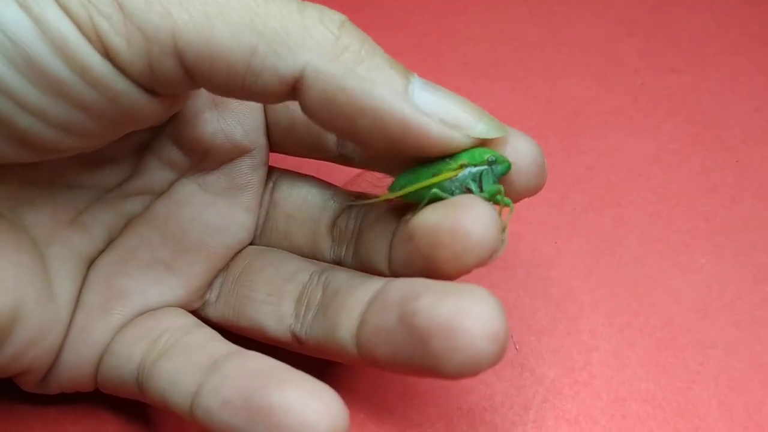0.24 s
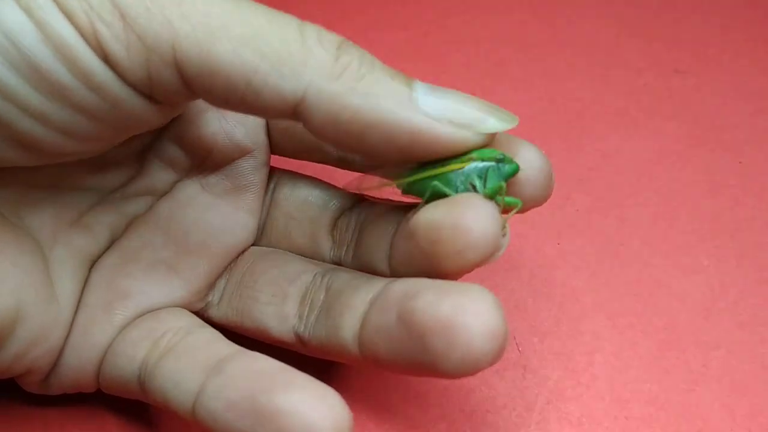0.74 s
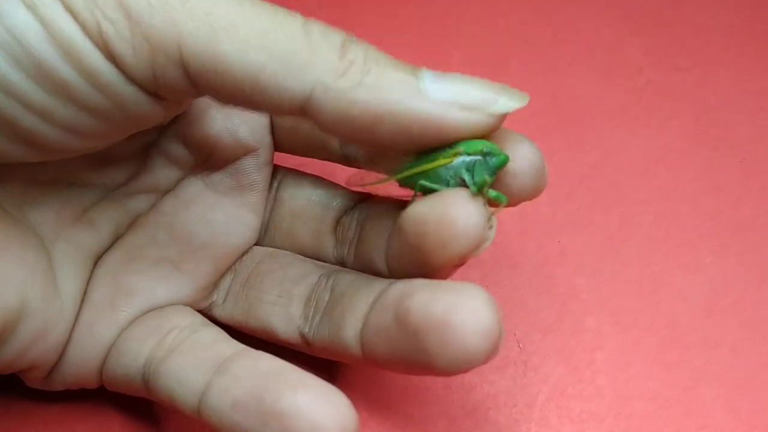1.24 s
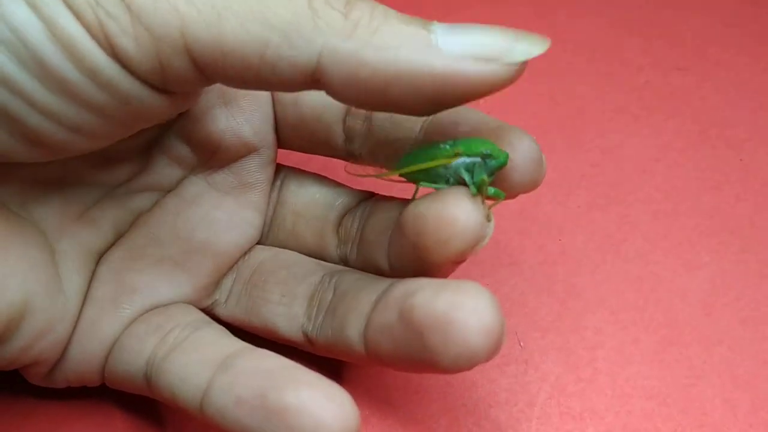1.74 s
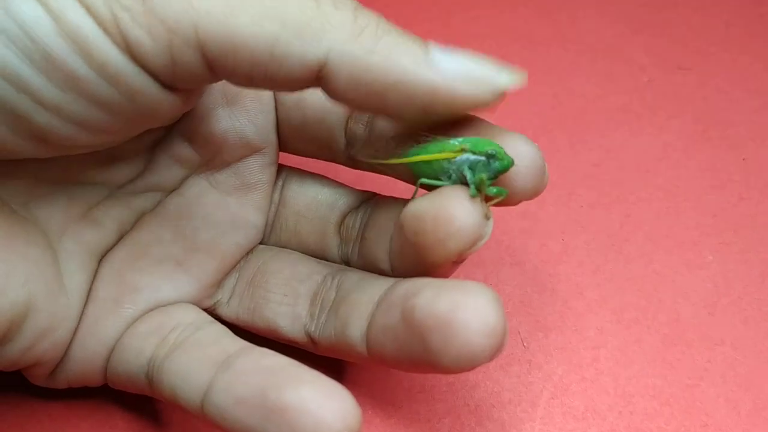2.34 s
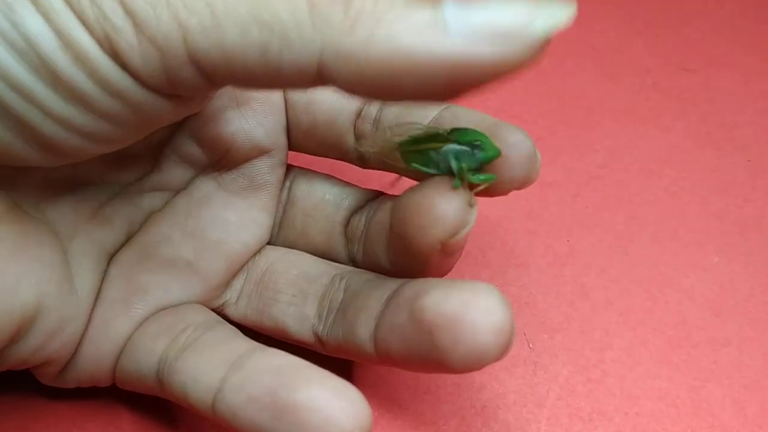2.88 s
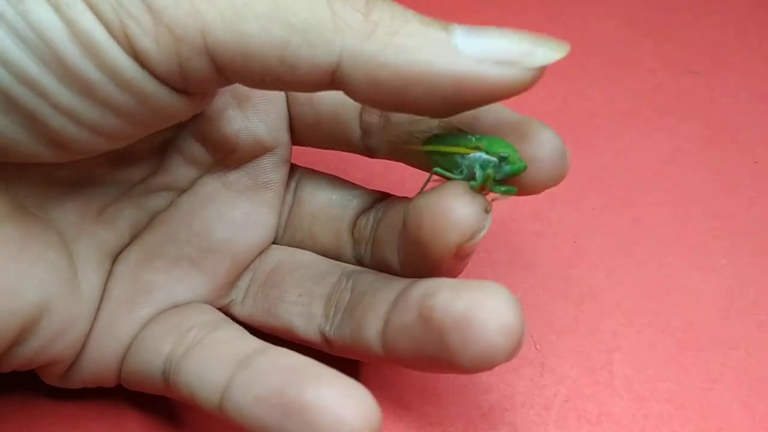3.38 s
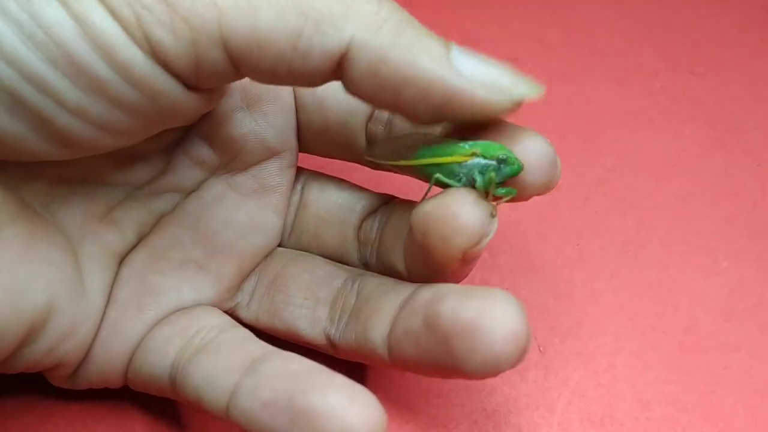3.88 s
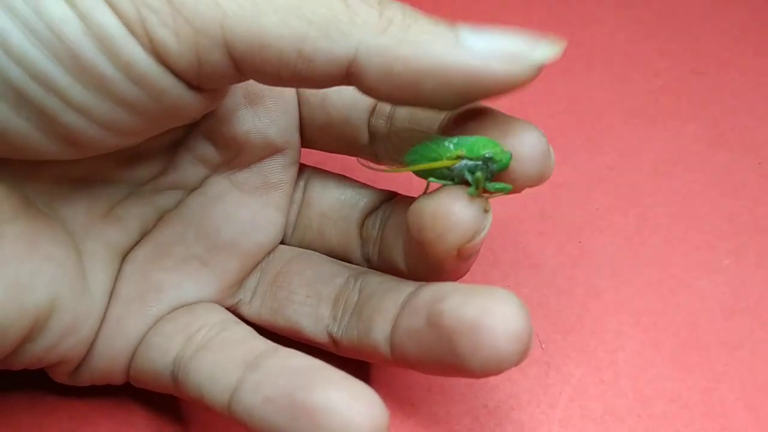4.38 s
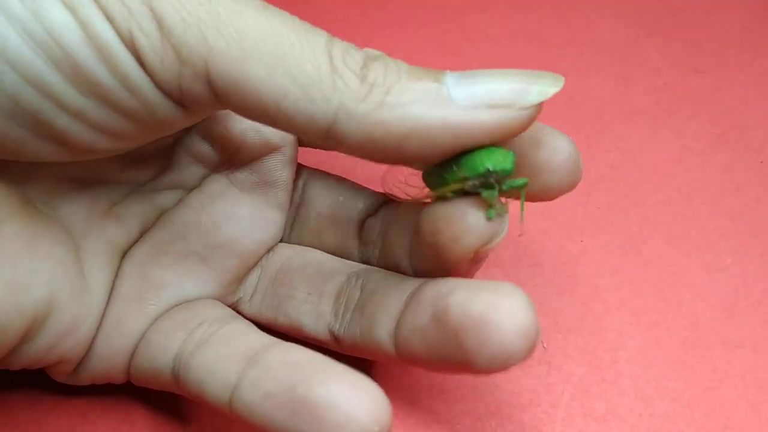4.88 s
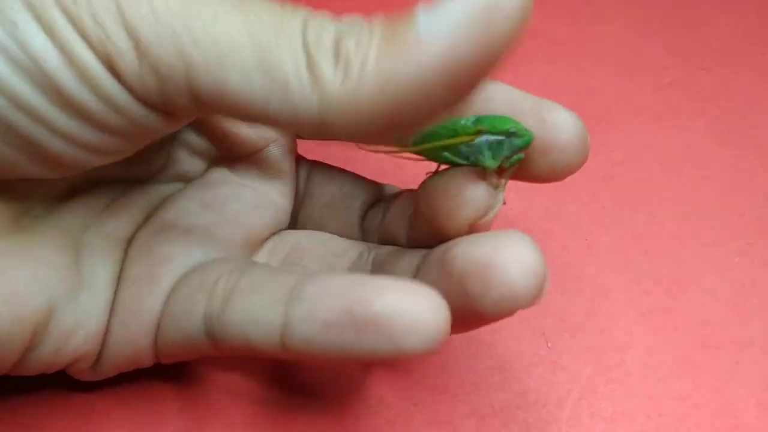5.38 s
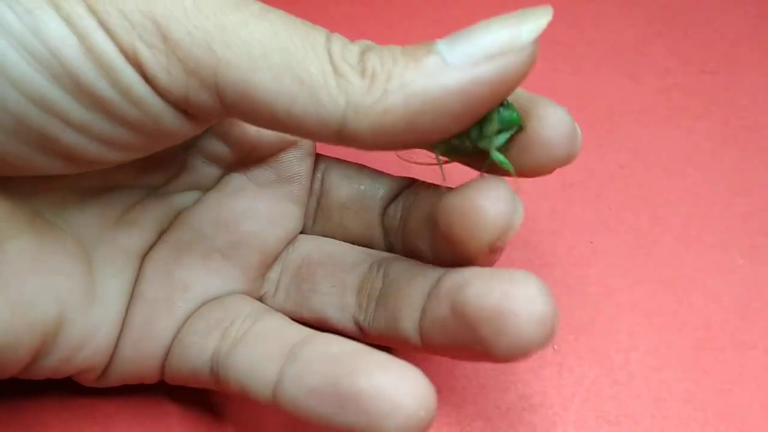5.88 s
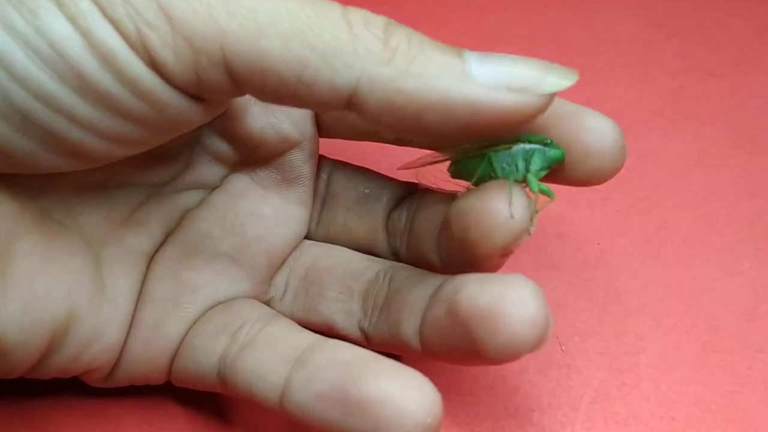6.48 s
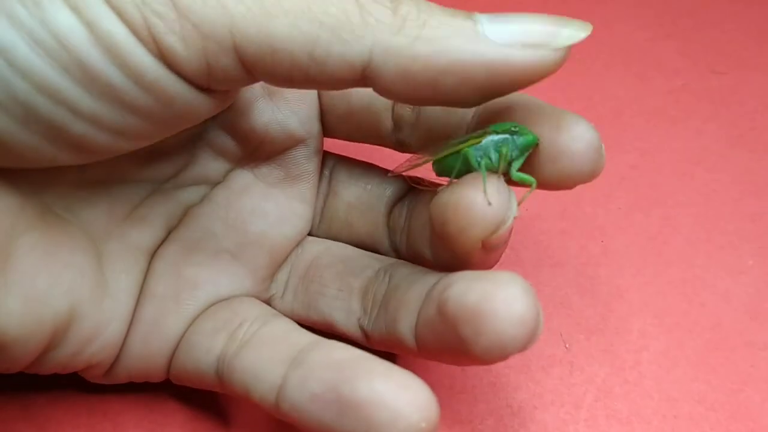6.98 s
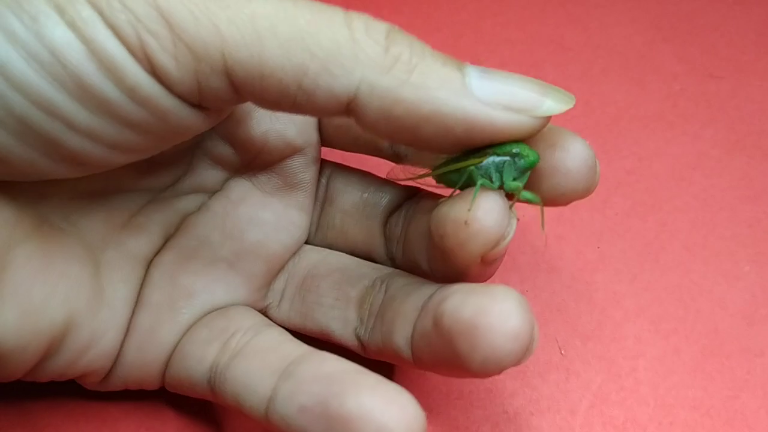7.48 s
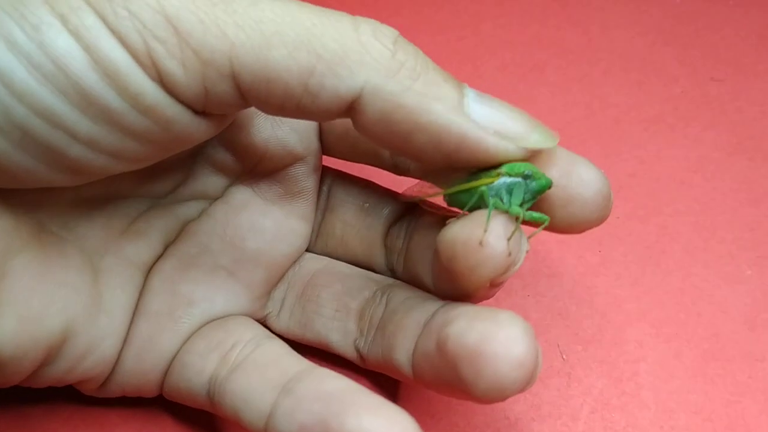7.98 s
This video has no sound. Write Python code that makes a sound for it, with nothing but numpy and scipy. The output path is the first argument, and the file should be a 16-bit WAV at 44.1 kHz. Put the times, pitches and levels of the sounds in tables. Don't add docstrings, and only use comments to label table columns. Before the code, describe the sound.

A cicada held between fingers, very close to a stereo microphone in a quiet room, calls at once: a loud, shrill, dry buzz of rapid clicks, about 140 a second. It runs unbroken for four seconds, then stutters in irregular bursts with brief pauses. Low room and street hum rises in each gap, with faint distant insects. Short scatter from hand and table and a light room tail surround the buzz.

```python
import sys
import numpy as np
from scipy import signal
from scipy.io import wavfile
from scipy.ndimage import uniform_filter1d

SR = 44100
rng = np.random.default_rng(int(sys.argv[2]) if len(sys.argv) > 2 else 0)


def makeup_ratio(level_db):
    decades = np.asarray(level_db, float) / 20
    return 10 ** decades


def put_to_file(sound):
    columns = np.atleast_2d(sound).T
    safe = np.clip(columns, -1, 1)
    whole_steps = np.round(safe * 32767)
    wavfile.write(sys.argv[1], SR, whole_steps.astype(np.int16))


N = 362943

# [f/Hz, level/dB per Hz]
HUM_SPECTRUM = [(35, -35), (100, -93), (190, 2.5), (280, 0), (500, -8.5), (900, -15), (1600, -14),
                (2300, 1), (3400, -86), (4900, -23), (6300, -31), (8800, -15), (12000, -38), (16000, -50)]
# [f/Hz, likeness]
PORT_LIKENESS = [(60, .66), (140, 0.86), (330, 0.93), (770, 0.47), (1200, -1.2), (1800, -0.2),
                 (2700, -0.82), (5000, -3.1)]
# [start t/s, end t/s, f/Hz, level/dB]
DISTANT_TONES = [
    (0.05, 0.45, 533, -60),
    (1.68, 1.9, 520, -61),
    (2.1, 2.3, 500, -56),
    (6.56, 6.74, 840, -56),
    (-1, 9, 119, -68),
    (-1, 9, 97, -73),
]
# [low f/Hz, high f/Hz, level/dB]
DISTANT_INSECTS = [(4230, 5300, -46), (7800, 10000, -49)]
# [first t/s, pulses, gap/ms, starting tymbal 0-1]
UNBROKEN_CALL = [(0.0013, 121, 7.211, 0), (0.8738, 40, 7.343, 1), (1.1675, 20, 7.14, 1),
                 (1.3103, 81, 7.28, 1), (1.9, 20, 7.38, 0), (2.0554, 75, 7.33, 1), (2.6135, 3, 7.43, 1),
                 (2.6444, 1, 7.0, 0), (2.6583, 23, 7.42, 1), (2.8406, 17, 7.36, 1), (2.9758, 58, 7.3, 1),
                 (3.3992, 39, 7.487, 1), (3.6912, 58, 7.26, 0)]
# [first t/s, pulses, gap/ms, starting tymbal 0-1]
STUTTER_BURSTS = [(4.1415, 2, 5.6, 0), (4.1644, 19, 7.32, 1), (4.3238, 1, 7.0, 0), (4.3515, 21, 7.34, 1),
                  (4.6508, 13, 7.58, 1), (4.9748, 1, 7.0, 0), (4.9925, 19, 7.24, 1), (5.1773, 1, 7.0, 0),
                  (5.2177, 19, 7.27, 1), (5.5495, 32, 7.17, 1), (5.7877, 39, 6.87, 0),
                  (6.0556, 19, 7.18, 1), (6.2236, 11, 7.07, 1), (6.3759, 3, 7.35, 1), (6.4067, 17, 7.01, 1),
                  (6.6276, 3, 8.14, 1), (6.7029, 50, 7.0, 1), (7.1553, 20, 7.12, 1), (7.3099, 3, 7.94, 0),
                  (7.3833, 6, 7.48, 0), (7.4754, 9, 7.45, 1), (7.6349, 4, 7.71, 0), (7.6931, 7, 8.21, 1),
                  (7.9295, 13, 7.1, 1), (8.1808, 2, 10.8, 0)]
# [t/s, early/ms]
TYMBAL_LIMP = [(0, .75), (.6, .55), (1.5, .65), (1.95, .9), (2.2, .65), (3.1, .45), (3.5, .9), (4.2, .95),
               (5.3, 1.1), (6.2, .7), (6.5, 1.3), (7.1, 1.1), (7.4, 1.6), (7.7, .7), (8, 1.25)]
# [t/s, rib level/dB, top level/dB]
GRIP_SHADE = [(0.0, -2, -4), (0.5, 0, -5), (0.8, -0.5, -4), (1.1, 0.5, -3.5), (1.9, 0.5, -4.5),
              (2.5, 1, -5.5), (3.0, 1, -4), (3.35, -1, -5), (3.6, 1, -2.5), (3.9, -.5, -5), (4.05, 1, -5),
              (4.7, 1, -1.5), (5.0, -8, 3), (5.3, -0.5, -2.5), (6.0, 1.5, -5.5), (6.45, -3, -1.5),
              (6.8, -0.5, -2.5), (8.2, -2.5, -3.5)]
# [t/s, level/dB]
SECOND_TYMBAL_LEVEL = [(0, 1), (1.9, -3.5), (2.2, -1), (4.1, 1), (4.7, 0.5), (5.03, 9), (5.3, 0.5), (5.9, 1),
                       (6.45, 3), (8.2, 3)]
# [t/s, first tymbal L-R/dB, second tymbal L-R/dB]
BODY_TURN = [(0.0, 0.6, 0.2), (0.95, -0.3, 2.0), (1.8, 0.2, 2.8), (2.35, 0.2, 0.0), (3.1, -0.5, -0.9),
             (4.1, 0.4, 0.2), (5.2, -1.7, -0.4), (6.0, -0.5, -1.6), (7.2, 1.3, 0.8), (8.0, 0.2, -0.8)]
# [f/Hz, start/ms, t60/ms, first tymbal level/dB, second tymbal level/dB, L-R/dB, left phase/turns]
RIB_MODES = [
    (5630, 0.01, 2.08, -2.5, -3.5, 0, 0.22),
    (5040, 0.25, 3.4, -6, -10, -13.5, 0.16),
    (4367, 0.72, 4.56, -6, -9, 14, 0.045),
    (3324, 0.66, 1.69, -14, -15.5, -17, 1),
]
# [Hz, ms, ms, dB, dB, dB, turns]
OVERTONE_MODES = [(6397, 0.083, 9.1, -13.5, -11, 2, 0.33), (7000, 0.078, 3.1, -10, -13, -6.5, 0.25),
                  (8185, 0.172, 7.3, -28, -21, 11.5, 0.6), (8490, 0.171, 1.43, -8.5, -12, -8.5, 0.56),
                  (9642, 0.2794, 4.13, -18.5, -15, -5, 0.69)]
# [Hz, ms, ms, dB, dB, dB, turns]
TOP_MODES = [(11300, 0.4, 3.5, -22, -19, -11, 0.65), (12660, 0.54, 4, -21, -24, 0, 0.0),
             (13800, 0.53, 6.6, -22, -20, 5, 0.4), (14350, 0.285, 3.3, -20, -26, -13, 0.12),
             (15600, 0.18, 4, -18, -10, -7, 0.0)]
# [Hz, ms, ms, dB, dB, dB, turns]
POP_MODES = [(4400, 3.5, 2.5, -22, -22, 2, 0.0), (5600, 3.5, 2.0, -21, -21, 0, 0.25),
             (6800, 3.5, 2.0, -21, -21, -1, 0.22), (8500, 3.7, 2.5, -20, -17, 3, 0.52),
             (9800, 3.8, 2.0, -23, -22, -2, 0.68), (12200, 3.9, 2.0, -31, -31, 0, 0.0),
             (15200, 3.6, 2.5, -30, -30, 0, 0.0)]
# [f/Hz, t60/s]
ROOM_DECAY = [(2500, 0.33), (4500, 0.2), (8000, 0.28), (12000, 0.27), (16000, 0.2)]
# [f/Hz, width/Hz, level/dB]
PORT_CAVITIES = [(3170, 200, -7), (6050, 350, -8), (14200, 800, -5)]

PULSE_SAMPLES = 300


def at_hz(points, hz):
    table_hz, values = np.transpose(points)
    return np.interp(np.log(hz), np.log(table_hz), values)


def at_times(rows, times):
    s, *columns = np.transpose(rows)
    return [np.interp(times, s, column) for column in columns]


def rms_one(x):
    return x / np.sqrt(np.mean(x ** 2) + 1e-20)


def drift(rate_hz):
    knots = rng.standard_normal(int(N / SR * 40) + 2)
    return np.interp(np.arange(N) / SR * rate_hz, np.arange(len(knots)), knots)


def band_pass(x, low_hz, high_hz, order=2):
    return signal.sosfilt(signal.butter(order, [low_hz, high_hz], "band", fs=SR, output="sos"), x)


def hum(level_db, patchy_db):
    out = 0
    together = drift(4.0)
    edges = 30 * 2 ** np.arange(0, 9.6, .5)
    white = rng.standard_normal((2, 2, N))
    for k, (low, high) in enumerate(zip(edges, edges[1:])):
        mid, side = band_pass(white[k % 2], low, high)
        hz = np.sqrt(low * high)
        alike = np.clip(at_hz(PORT_LIKENESS, hz), -1, 1)
        gain = makeup_ratio(at_hz(HUM_SPECTRUM, hz) + patchy_db * (.5 * together + drift(22.0)))
        out = out + gain * (np.sqrt(1 + alike) * mid + np.sqrt(1 - alike) * side * [[1], [-1]])
    return makeup_ratio(level_db) * rms_one(out) * makeup_ratio(np.array([[-.7], [.7]]))


def far_tones():
    s = np.arange(N) / SR
    out = 0
    for start, end, hz, db in DISTANT_TONES:
        fade = np.clip(np.minimum(s - start, end - s) / 0.054, 0, 1)
        out = out + makeup_ratio(db) * fade * np.sin(2 * np.pi * hz * s)
    return out


def far_chorus():
    out = 0
    for low_hz, high_hz, db in DISTANT_INSECTS:
        hiss = rms_one(band_pass(rng.standard_normal((2, N)), low_hz, high_hz, order=4))
        out = out + makeup_ratio(db + 2.0 * drift(2.0)) * hiss
    return out


def bucklings(jitter_ms):
    times, side = [], []
    for first_s, pulses, gap_ms, starter in UNBROKEN_CALL + STUTTER_BURSTS:
        count = np.arange(pulses)
        times.append(first_s + count * gap_ms / 1000)
        side.append((count + starter) % 2)
    times, side = np.concatenate(times), np.concatenate(side)
    early_ms, = at_times(TYMBAL_LIMP, times)
    return times + (jitter_ms * rng.standard_normal(len(times)) - side * early_ms) / 1000, side


def rings(modes, side, level_db, pan_db, rise_ms, vary_db, vary_ms, vary_pitch):
    left_lead_ms = .23
    out = np.zeros((2, len(side), PULSE_SAMPLES))
    ms = np.arange(PULSE_SAMPLES) / SR * 1000
    for hz, start_ms, t60_ms, first_db, second_db, lean_db, left_turns in modes:
        chance = rng.standard_normal((len(side), 4))[:, :, None]
        wander = uniform_filter1d(rng.standard_normal((2, len(side))), size=40)[:, :, None] * np.sqrt(40)
        since = ms - .5 - start_ms - vary_ms * chance[:, 0]
        age = np.maximum([since + left_lead_ms, since], 0)
        rise = 1 - np.exp(-(age / rise_ms) ** 2)
        shape = rise * np.exp(-np.log(1000) * (age / t60_ms) ** 1.5)
        turns = hz * (1 + vary_pitch * (chance[:, 1] + wander[0])) * since / 1000
        mode_db = np.where(side, second_db, first_db)[:, None]
        height = makeup_ratio(mode_db + vary_db * (.7 * chance[:, 2] + .7 * wander[1]))
        lead = left_turns + .04 * chance[:, 3]
        out[0] += height * makeup_ratio(lean_db / 2) * shape[0] * np.sin(2 * np.pi * (turns + lead))
        out[1] += height * makeup_ratio(-lean_db / 2) * shape[1] * np.sin(2 * np.pi * turns)
    energy = np.sum(np.sum(out ** 2, axis=0) ** 2, axis=1) ** .5
    usual = np.where(side, energy[side == 1].mean(), energy[side == 0].mean())
    gain = makeup_ratio(level_db + np.outer([.5, -.5], pan_db)) * (usual / energy) ** .5
    return out * gain[:, :, None]


def cicada():
    times, side = bucklings(jitter_ms=.18)
    shade_db, top_db = at_times(GRIP_SHADE, times)
    shade_db = shade_db + .45 * rms_one(uniform_filter1d(rng.standard_normal(len(times)), size=20))
    rested = np.diff(times, prepend=0) > .012
    lone = rested & (np.diff(times, append=9) > .012)
    force_db = 12.04 + 1.9 * rested - 1.5 * lone
    second_level_db, = at_times(SECOND_TYMBAL_LEVEL, times)
    rib_db = force_db + shade_db + side * second_level_db
    overtone_db = force_db - 0.23 * shade_db
    treble_db = force_db + 0.25 * shade_db + top_db - 4.0
    first_pan_db, second_pan_db = at_times(BODY_TURN, times)
    pan_db = np.where(side, second_pan_db, first_pan_db)
    pulses = rings(RIB_MODES, side, rib_db, 1.5 * pan_db,
                   rise_ms=.45, vary_db=.6, vary_ms=.015, vary_pitch=.004)
    pulses += rings(OVERTONE_MODES, side, overtone_db - 4.5, 0,
                    rise_ms=0.14, vary_db=0.0, vary_ms=0.21, vary_pitch=0.013)
    pulses += rings(TOP_MODES, side, treble_db, 0,
                    rise_ms=0.3, vary_db=1.5, vary_ms=.15, vary_pitch=0.02)
    pulses += rings(POP_MODES, side, overtone_db - 5, 0,
                    rise_ms=.15, vary_db=3.0, vary_ms=.3, vary_pitch=.03)
    starts = np.round((times - .001) * SR).astype(int)[:, None]
    at = (starts + np.arange(PULSE_SAMPLES) + PULSE_SAMPLES).ravel()
    buzz = np.array([np.bincount(at, port.ravel(), N + 3 * PULSE_SAMPLES) for port in pulses])
    buzz = buzz[:, PULSE_SAMPLES:][:, :N]
    shrill = signal.sosfilt(signal.cheby2(8, 40, 2350, "high", fs=SR, output="sos"), buzz)
    thud_band = signal.cheby2(5, 40, [350, 2300], "band", fs=SR, output="sos")
    thud = signal.sosfilt(thud_band, rng.standard_normal((2, N)))
    return shrill + makeup_ratio(-36.5) * thud * np.sqrt(uniform_filter1d(buzz ** 2, size=600) + 1e-12)


def hand(x, near_db, near_t60_s, rise_s, dull_hz):
    poses, pose_s = 4, .12
    s = np.arange(int(.06 * SR)) / SR
    bright = signal.lfilter([1, -1.1, .2, .3], [1], rng.standard_normal((poses, 2, len(s))))
    bright = signal.sosfilt(signal.butter(2, dull_hz, fs=SR, output="sos"), bright)
    scatter = bright * makeup_ratio(-60 * s / near_t60_s) * np.clip(s / rise_s, 0, 1)
    pose = np.arange(N) / SR / pose_s % poses
    out = 0
    for k, response in enumerate(scatter):
        away = np.abs((pose - k + poses / 2) % poses - poses / 2)
        share = np.cos(np.pi / 2 * np.minimum(away, 1))
        response = response / np.sqrt(np.sum(response ** 2) / 2)
        out = out + signal.oaconvolve((share * x.mean(axis=0))[None], response, axes=1)[:, :N]
    return makeup_ratio(near_db) * out


def room(x, far_db, far_start_s):
    s = np.arange(int(.7 * SR)) / SR
    white = rng.standard_normal((2, 2, len(s)))
    edges = 2000 * 2 ** np.arange(0, 3.2, 1 / 3)
    tail = 0
    for k, (low, high) in enumerate(zip(edges, edges[1:])):
        t60_s = at_hz(ROOM_DECAY, np.sqrt(low * high))
        tail = tail + band_pass(white[k % 2], low, high) * makeup_ratio(-60 * s / t60_s)
    tail = tail * np.clip(s / far_start_s, 0, 1)
    tail = tail / np.sqrt(np.sum(tail ** 2) / 2)
    return makeup_ratio(far_db) * signal.fftconvolve(x.mean(axis=0)[None], tail, axes=1)[:, :N]


def ports(x):
    for hz, width_hz, dip_db in PORT_CAVITIES:
        b, a = signal.iirpeak(hz, hz / width_hz, fs=SR)
        x = x - (1 - makeup_ratio(dip_db)) * signal.lfilter(b, a, x)
    return signal.sosfilt(signal.butter(4, 90, "high", fs=SR, output="sos"), x)


def scene():
    background = makeup_ratio(2.0) * hum(level_db=-48, patchy_db=1.5) + far_tones() + far_chorus()
    insect = cicada()
    scatter = hand(insect, near_db=-3.5, near_t60_s=0.021, rise_s=0.0022, dull_hz=10200.0)
    walls = room(insect, far_db=-12.0, far_start_s=0.0024)
    return insect + scatter + walls + background


def roll_off(x):
    return signal.sosfilt(signal.butter(12, 16990, fs=SR, output="sos"), x)


def record(dry):
    threshold_db, depth_db, release_db_per_s = -22.5, 12, 165
    ceiling = 1.45
    heard = ports(dry)
    level_db = 10 * np.log10(uniform_filter1d(np.mean(heard ** 2, axis=0), size=89) + 1e-12)
    ramp = release_db_per_s * np.arange(N) / SR
    duck_db = np.maximum.accumulate(np.clip(level_db - threshold_db, 0, depth_db) + ramp) - ramp
    ducked = heard * makeup_ratio(-uniform_filter1d(duck_db, size=45))
    rounded = ceiling * np.tanh(makeup_ratio(0.96) * ducked / ceiling)
    rounded = signal.sosfilt(signal.butter(2, 70, "high", fs=SR, output="sos"), rounded)
    mix = signal.sosfilt(signal.cheby2(16, 60, 16150, fs=SR, output="sos"), rounded)
    return roll_off(mix)


dry = scene()
out = record(dry)
put_to_file(out)
```